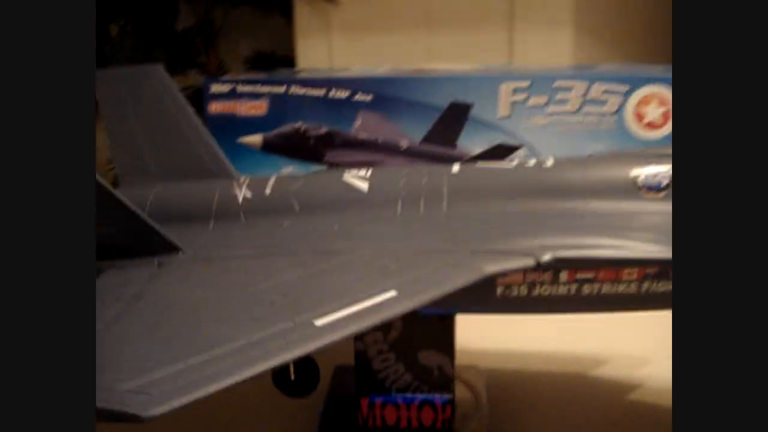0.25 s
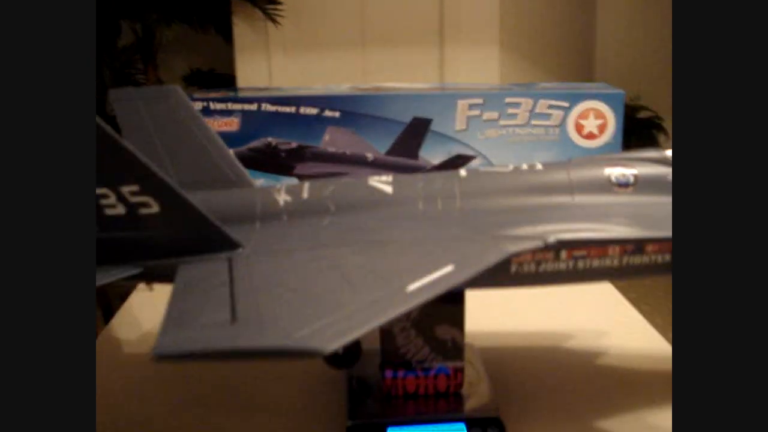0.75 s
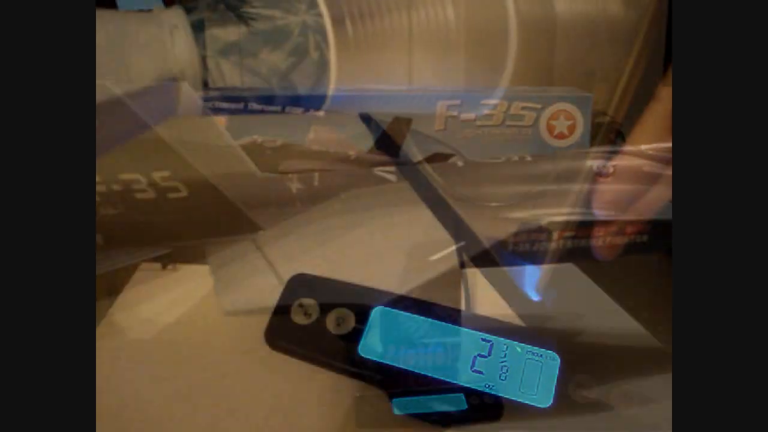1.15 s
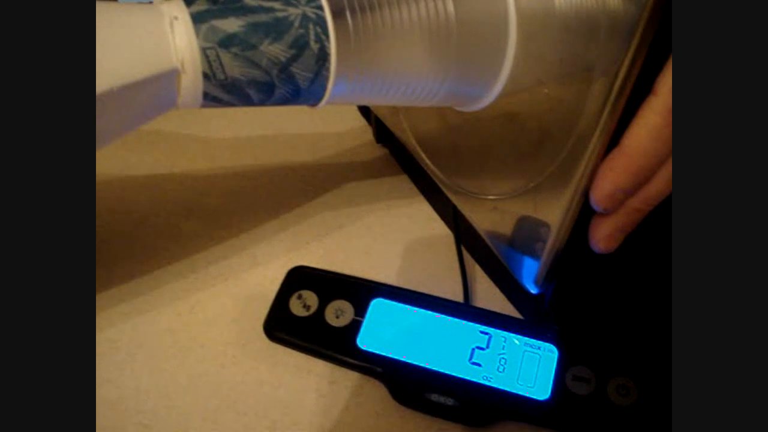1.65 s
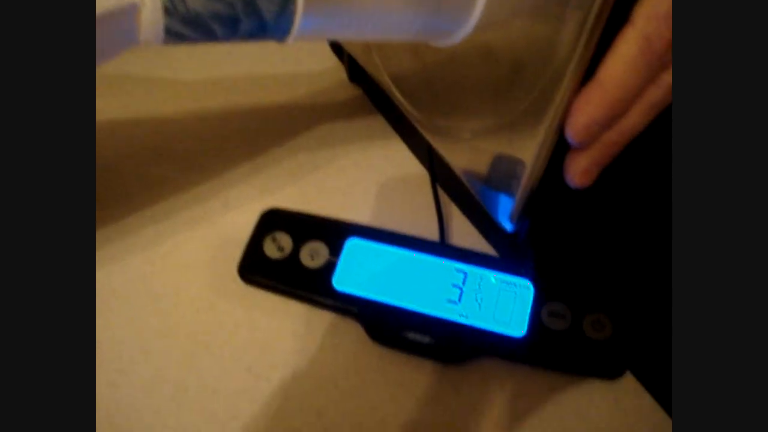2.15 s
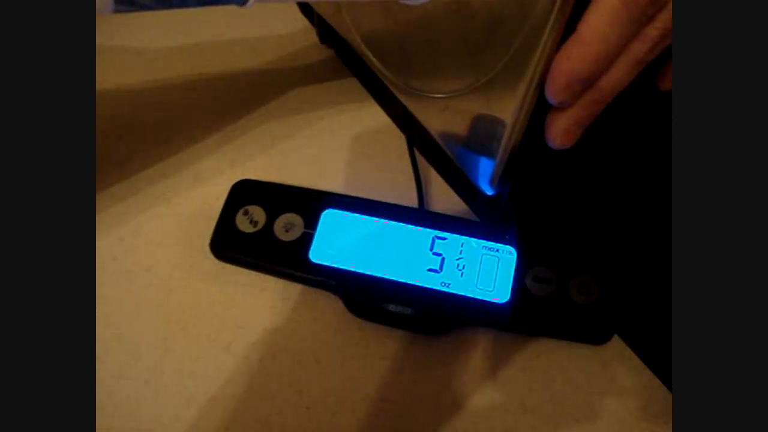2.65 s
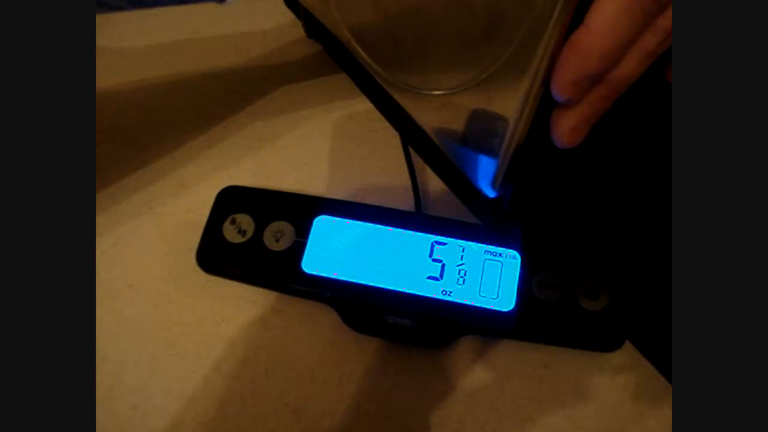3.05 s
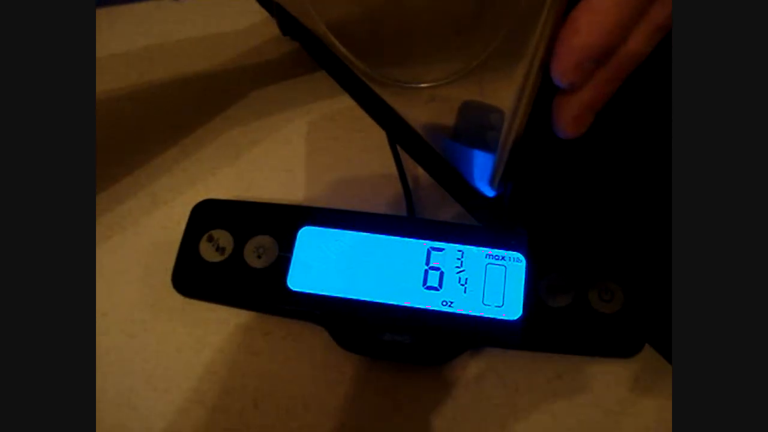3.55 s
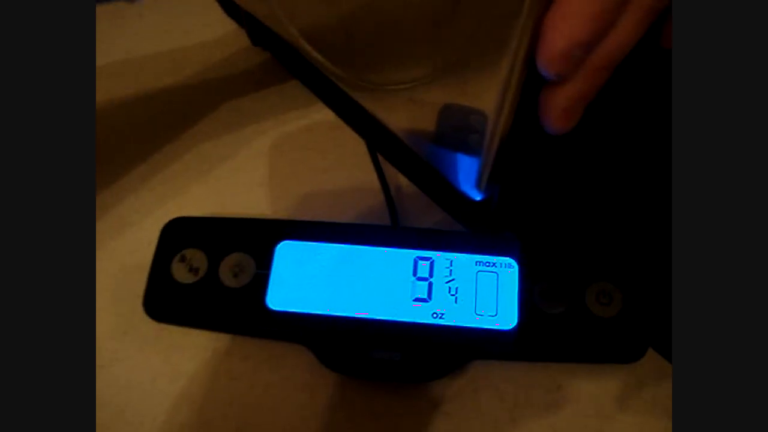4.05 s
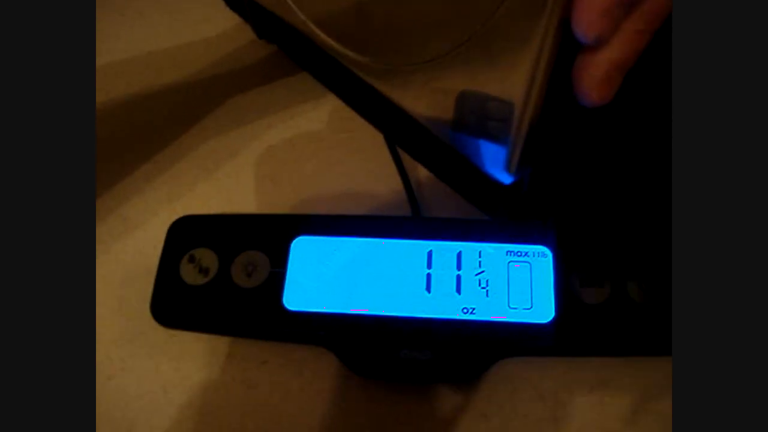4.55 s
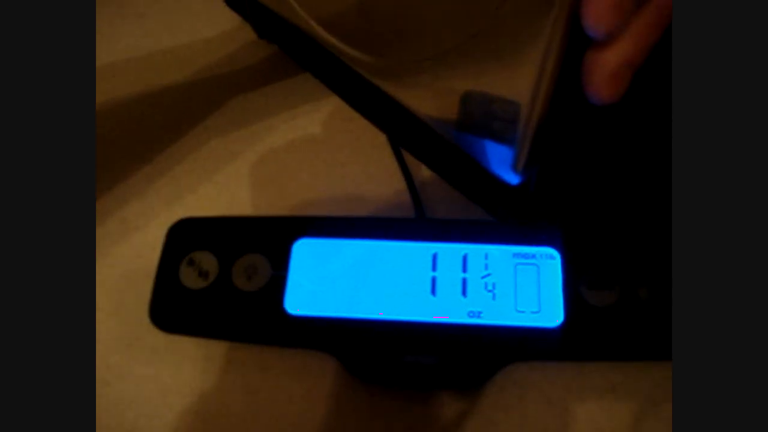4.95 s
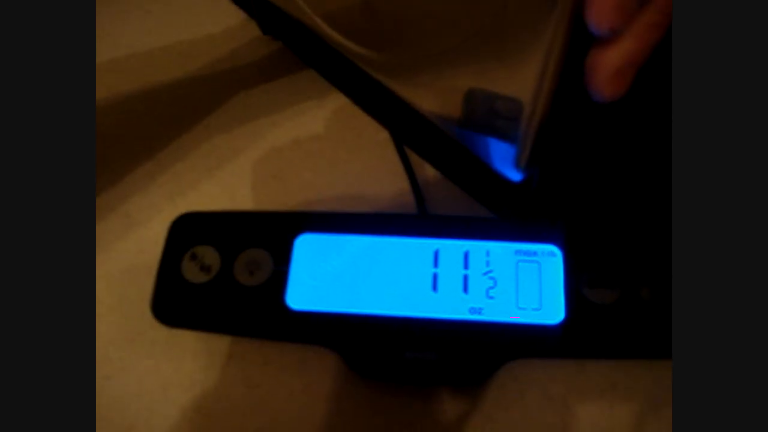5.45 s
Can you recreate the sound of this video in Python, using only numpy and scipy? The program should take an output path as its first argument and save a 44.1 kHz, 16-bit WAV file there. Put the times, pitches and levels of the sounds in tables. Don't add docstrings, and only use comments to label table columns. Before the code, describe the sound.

A small room, heard through one hand-held camera microphone with narrow, slightly holey treble. From 0 to 0.9 s there is only soft, low-weighted room hush, with scattered tiny bright ticks, very faint lens-motor blips and a sharper plastic snap at about 0.4 s. From 0.9 to 1.5 s an electric ducted fan fades in, already spinning, with a soft puff of wind on the microphone near 1.1 s. Its whirring hum, roughly 200 turns per second with stacked buzzing harmonics, holds until about 1.8 s, then climbs quickly through 2.3 to 2.6 s and on in smaller surges. A thin, steady-pitched high electronic whine swells around 1.5 s and most strongly at 2.9 s, then again from 3.5 s, fading slowly. Rough pulsing air rushes throughout. By 4.6 to 5.4 s the tone almost levels above twice its starting pitch, then rises again as the sound ends, still running.

```python
import sys
import numpy as np
from scipy import signal
from scipy.fft import rfft, irfft
from scipy.io import wavfile

SR = 44100
rng = np.random.default_rng(int(sys.argv[2]) if len(sys.argv) > 2 else 0)


def transcribe(signal):
    frames = np.atleast_2d(signal).T
    limited = np.clip(frames, -1, 1)
    pcm = np.round(limited * 32767).astype(np.int16)
    wavfile.write(sys.argv[1], SR, pcm)


def voltage_ratio(level):
    return 10 ** (np.asarray(level, float) / 20)


N = 251370

# pitch_hz, level_db
ROOM_COLOUR = [(20, -8.5), (60, -11.5), (150, -2.5), (300, 0.5), (430, -2.5), (560, -5.5), (1000, -9.5),
               (2200, -17.5), (3300, -15.5), (4000, -20), (4800, -16.5), (5800, -21), (7500, -19.5),
               (10000, -28.5)]
ROOM_BEFORE_DB, ROOM_UNDER_FAN_DB = -50.5, -61
FADE_FROM_S, FADE_S = 0.91, 0.62

# start_s, peak_db, pitch_hz
TICKS = [(0.0726, -35, 4900), (0.156, -39, 5730), (0.3232, -32, 7000), (0.358, -35, 4800),
         (0.434, -39, 5720), (0.4544, -38, 4500), (0.507, -36, 4800), (0.578, -44, 5200),
         (0.59, -34.5, 5800), (0.8916, -31, 4700), (0.9398, -38, 4750), (0.9567, -67, 4780)]
# start_s, end_s, pitch_hz, level_db
LENS_BLIPS = [(.155, .17, 5755, -60), (.205, .23, 5755, -62), (.24, .265, 5755, -62), (.3, .325, 5755, -62),
              (.19, .215, 6234, -64), (.24, .31, 6234, -69), (.35, .37, 4791, -60), (.435, .45, 5755, -62),
              (.555, .58, 4791, -63), (.612, .635, 5755, -60), (.69, .735, 4791, -64),
              (.89, .905, 4791, -59), (.955, .975, 4791, -62), (.61, .65, 8624, -74), (.72, .76, 8624, -73)]
# start_s, peak_db
SNAP = [
    (0.4052, -29),
]
# pitch_hz, level_db, time_to_fall_60_db_s
SNAP_MODES = [(5600, -2, 0.0041), (2420, -9, 0.0098), (1540, -8.5, 0.037)]

# time_s, speed_turns_per_s
THROTTLE = [(0.805, 176.8), (1.007, 205.6), (1.737, 204.4), (1.829, 239.6), (2.103, 236.9), (2.327, 318.6),
            (2.645, 306.0), (3.069, 334.4), (3.142, 353.3), (3.349, 336.0), (3.604, 372.4), (3.964, 375.9),
            (4.102, 410.2), (4.4, 432.7), (4.649, 417.1), (4.837, 435.1), (5.395, 433.8), (5.523, 491.2)]
ROTOR_LAG_S = 0.2555
MID_SPEED = 300

# pitch_hz, width_hz, level_db
TABLE = [(191.8, 4.6, 6), (212.8, 8, 0.3), (243, 24, -8.5), (250.7, 18, 2.5), (268.5, 12, -4.5),
         (284.3, 5.7, -2.7), (310.4, 13.6, -1), (322.5, 8.1, -0.2), (333.3, 9.3, -2.5), (358, 19, 0.7),
         (395.3, 9.7, 6), (417.7, 11, -0.6), (432.6, 5.4, 1), (446, 8.8, 2)]
STAND = [(354.6, 11.5, 12), (444.4, 9.6, -12), (460, 10, -8), (477, 9.9, -8), (480, 9.9, -16.5),
         (637.6, 7.5, 4.5), (697, 6.2, 7.5), (731.6, 26.8, 5.5), (766, 10, 4), (807.5, 45.4, 2),
         (866.8, 29, -2.6), (931, 44, 8), (1094.2, 51.7, -17), (1200.0, 20, 11)]
SHELL = [(539, 13, 10.0), (630.1, 24.5, 3.5), (666, 14, -5), (750, 120, -1.5), (883, 25, -6), (947, 12, -1),
         (1011, 30, -1), (1090.6, 47.0, -0.4), (1206, 59, 0.5), (1332, 110, -14), (1392, 43, 5.6),
         (1562, 41, 5), (1687, 33.8, -4.5), (1779, 46.9, 3.5)]
INTAKE = [(860, 290, 7), (1025, 18, 6), (1200, 24.5, -1), (1280, 61, -12), (1449.3, 89, 1.1),
          (1674.9, 25, -20.5), (1823, 27, -22.5), (2223, 52, -9.5), (2515, 41, -3), (2594, 46, 1.2),
          (2778, 40, -3), (3080, 220, -1), (3500, 310, -0.5), (4050, 210, 10.0)]
BLADE_ROW = [(1570, 66, -3.5), (1990, 89, -16.5), (2120, 69, -11), (2240, 96, -9.5), (2470, 220, -5.5),
             (2625, 69, -2.5), (2773, 108, 1), (2907, 91, -2), (3017, 137, 3.5), (3158, 200, -1.5),
             (3308, 85, -0.5), (3403, 60, -2.5), (3540, 75, 2), (3805, 120, -10)]
NOZZLE = [(3220, 140, -2), (3540, 150, -2), (3810, 110, 4.5), (4530, 220, 7), (4780, 100, 1),
          (4946, 210, 2), (5530, 150, 0), (5940, 210, 2.5), (6390, 350, 7.5), (6640, 240, 2.5),
          (6814, 170, 2), (6970, 260, -9)]
STATOR = [(5420, 220, -2.5), (6000, 180, -5), (7200, 200, -11.5), (8150, 200, 0), (8780, 220, -4.5),
          (8920, 150, -5.5), (9550, 100, -9.5)]
MOTOR_CAN = [(3350, 150, -11.5), (3650, 240, 0.5), (4050, 510, -3.5), (4500, 150, -5.5), (4670, 220, -3),
             (5600, 200, -10), (6400, 220, -11), (6860, 180, 0)]
WINDINGS = [(6880, 400, 5.2), (7280, 190, 0.5)]
FEET = [(323, 9.5, -10.5), (456, 15, -14.5), (505, 29, -17)]
MOUNT = [(762, 27, -0.5), (806, 21, -11), (893, 18, -6.5)]
# level_db (at mid speed), slope_db_per_octave
STRENGTH = [(-36, 1.6), (-39, -6), (-39, 2.5), (-41, -1.5), (-42.5, 11.5), (-46, 6), (-48, 9),
            (-48.5, -6.7), (-35.5, -0.5), (-48, -0.8), (-51, -12), (-41.5, -9), (-66, -23.5)]

SWITCH_HZ = 7577
# peak_s, rise_s, fall_s, level_db
WHINE_SWELLS = [
    (1.45, .25, .4, -51),
    (1.9, 0.13, 0.19, -66),
    (2.9, .15, 0.18, -47.5),
    (3.55, 0.16, 1.7, -51),
    (5.7, 0.18, .2, -55),
]

# pitch_hz, width_hz, level_db
RUMBLE = [(213, 120, 2.5), (330, 153, -4), (474, 210, 2.5)]
DUCT = [(754, 270, -1.5), (1100, 260, -15), (1283, 268, 1), (2125, 470, -7)]
WAKE = [(2340, 480, -8.5), (2750, 470, 4.5), (3390, 710, -1.5), (3870, 1500, -4.5)]
JET = [(4900, 680, -2.5), (6150, 900, -9.5), (6720, 1040, -5), (7300, 850, -11), (9000, 400, -15.5)]
# time_s, level_db
FLOW = [(.9, -33.5), (1.5, -35.5), (1.7, -36.5), (1.85, -37), (2.0, -35.5), (2.3, -36.5), (2.5, -34),
        (2.7, -34), (3.1, -35.5), (3.3, -34.5), (3.9, -37.5), (4.1, -35), (4.25, -36), (4.6, -39.5),
        (5.0, -37), (5.2, -37.5), (5.55, -35.5), (5.7, -38.5)]
# time_s, level_db
PUFFS = [
    (1.1, -55),
    (1.3, -71),
    (1.45, -82),
    (1.6, -73),
    (2.27, -77),
    (3.0, -71),
    (5.43, -65),
    (5.7, -70),
]

# start_s, length_s, lowest_hz
TREBLE_GAPS = [
    (.043, .024, 4600),
    (.083, .023, 5000),
    (.295, .024, 6500),
    (.396, .008, 2900),
    (.412, .021, 2700),
    (.514, .03, 5000),
    (.562, .01, 5500),
    (.597, .014, 4600),
    (.866, .021, 4600),
]


def rms_one(x):
    return x / np.sqrt(np.mean(x ** 2) + 1e-20)


def in_time(rows):
    s, *columns = np.transpose(rows)
    return [np.interp(np.arange(N) / SR, s, column) for column in columns]


def bump(x, width):
    return np.exp(-(x / width) ** 2)


def drift(rate):
    r = np.exp(-80 * np.pi * rate / SR)
    noise = rng.standard_normal(N // 40 + 2002)
    slow = signal.lfilter([1], [1, -2 * r, r * r], noise)[2000:]
    return np.interp(np.arange(N) / 40, np.arange(len(slow)), rms_one(slow))


def resonate(x, hz, width):
    r = np.exp(-np.pi * width / SR)
    feedback = [1, -2 * r * np.cos(2 * np.pi * hz / SR), r * r]
    return signal.lfilter([(1 - r * r) / 2, 0, (r * r - 1) / 2], feedback, x)


def ring(clicks, hz, t60):
    r, w = voltage_ratio(-60 / (t60 * SR)), 2 * np.pi * hz / SR
    return signal.lfilter([0, np.sin(w)], [1, -2 * r * np.cos(w), r * r], clicks + 1e-18)


def body_db(modes, hz):
    slow = hz[::64]
    gain = sum(voltage_ratio(db) / (1 + 2j * (slow - mode_hz) / width) for mode_hz, width, db in modes)
    gain_db = 20 * np.log10(np.abs(gain) + 1e-9)
    return np.interp(np.arange(N) / 64, np.arange(len(slow)), gain_db)


def tone(cycles, level_db, flutter_db, wobble):
    phase = 2 * np.pi * (cycles + rng.random()) + wobble * drift(17)
    flutter = flutter_db * (drift(22.3) + 0.59 * drift(60))
    return np.sqrt(2) * voltage_ratio(level_db + flutter) * np.sin(phase)


def room_tone(fade):
    hz = np.fft.rfftfreq(N, 1 / SR) + 1
    points_hz, points_db = np.transpose(ROOM_COLOUR)
    colour = voltage_ratio(np.interp(np.log(hz), np.log(points_hz), points_db))
    noise = rms_one(irfft(rfft(rng.standard_normal(N)) * colour, N))
    gain = np.hypot((1 - fade) * voltage_ratio(ROOM_BEFORE_DB), fade * voltage_ratio(ROOM_UNDER_FAN_DB))
    return gain * voltage_ratio(0.2 * drift(15)) * noise


def struck(s, db, length_s):
    burst, at = np.zeros(N), round(s * SR)
    fall = np.exp(-np.arange(400) / (length_s * SR))
    burst[at:at + 400] = voltage_ratio(db) * fall * rng.standard_normal(400) / np.sqrt(np.sum(fall ** 2))
    return burst


def camera_ticks():
    out = 0
    for s, db, hz in TICKS:
        hit = struck(s, db, length_s=0.0014)
        out = out + 0.48 * ring(hit, hz, t60=0.0048)
        out = out + ring(hit, 5400, t60=0.002) + 0.18 * ring(hit, 3400, t60=0.0016)
    return out


def lens_drive():
    out, t = 0, np.arange(N) / SR
    for start, end, hz, db in LENS_BLIPS:
        shape = np.clip(np.minimum(t - start, end - t) / 0.0038, 0, 1)
        out = out + voltage_ratio(db + 5) * shape * np.sin(2 * np.pi * hz * t)
    return out


def snap():
    (s, db), = SNAP
    start_hz, end_hz, fall_s = 4600, 1600, 0.00354
    t = np.maximum(np.arange(N) / SR - s, 0)
    hz = end_hz + (start_hz - end_hz) * bump(t, fall_s)
    shape = np.minimum(t / 0.00069, 1) * bump(t, 0.0049)
    chirp = voltage_ratio(db - 4.5) * shape * np.sin(2 * np.pi * np.cumsum(hz) / SR)
    hit = struck(s, db - 0.5, length_s=0.00076)
    return chirp + sum(voltage_ratio(mode_db) * ring(hit, mode_hz, t60) for mode_hz, mode_db, t60 in SNAP_MODES)


def shaft():
    asked, r = in_time(THROTTLE)[0], np.exp(-1 / (ROTOR_LAG_S * SR))
    return signal.lfilter([1 - r], [1, -r], asked - asked[0]) + asked[0]


def orders_in():
    return [(TABLE, [1]), (STAND, [2]), (SHELL, [3, 4]), (INTAKE, [5, 6, 7, 9]), (BLADE_ROW, [8]),
            (NOZZLE, [16]), (STATOR, [24]), (MOTOR_CAN, [18]), (WINDINGS, [36])]


def rotor_tones(speed):
    turns, octaves, out = np.cumsum(speed) / SR, np.log2(speed / MID_SPEED), 0
    pairs = [(body, order) for body, orders in orders_in() for order in orders]
    for (body, order), (db, slope_db) in zip(pairs, STRENGTH):
        level_db = db + slope_db * octaves + body_db(body, order * speed)
        rough = np.sqrt(order)
        out = out + tone(order * turns, level_db, flutter_db=0.68 + 0.3 * rough, wobble=0.084 * rough)
    for order, db, body in ((1.5, -36, FEET), (2.5, -37.5, MOUNT)):
        level_db = db + body_db(body, order * speed)
        out = out + tone(order * turns, level_db, flutter_db=1.5, wobble=0.4)
    return out


def controller(speed):
    t, turns = np.arange(N) / SR, np.cumsum(speed) / SR
    swell = sum(voltage_ratio(db) * bump(t - s, np.where(t < s, rise, fall)) for s, rise, fall, db in WHINE_SWELLS)
    out = swell * tone(SWITCH_HZ * t, 0, flutter_db=1.5, wobble=0.1)
    # order, pitch_hz, width_hz, level_db
    for order, hz, width, db in ((6, 9080, 71, -55), (12, 9970, 130, -61)):
        gain = voltage_ratio(db) * bump(SWITCH_HZ + order * speed - hz, width)
        out = out + gain * tone(SWITCH_HZ * t + order * turns, 0, flutter_db=1.5, wobble=0.1)
    return out


def rush(modes, level_db, turns, gust_db, beat):
    out = 0
    for hz, width, db in modes:
        band = resonate(resonate(rng.standard_normal(N), hz, 1.72 * width), hz, 1.72 * width)
        gust = gust_db * (drift(12) + 0.81 * drift(110))
        out = out + voltage_ratio(db + gust) * band
    return voltage_ratio(level_db) * rms_one(out) * (1 + beat * np.sin(2 * np.pi * turns))


def air(speed):
    turns, flow_db = np.cumsum(speed) / SR, in_time(FLOW)[0]
    octaves = np.log2(speed / MID_SPEED)
    effort = ROTOR_LAG_S * SR * np.gradient(speed) / speed

    def strength(db, slope_db, effort_db):
        return flow_db + db + slope_db * octaves + effort_db * effort

    rumble_stall = 7.4 * bump(np.log2(speed / 279), 0.11)
    duct_stall = 6.94 * bump(np.log2(speed / 258), 0.43)
    rumble = rush(RUMBLE, strength(-18, -6, 29) + rumble_stall, turns, gust_db=3.1, beat=0.12)
    duct = rush(DUCT, strength(-5.5, -3.5, 8.2) + duct_stall, turns, gust_db=1.58, beat=0.14)
    wake = rush(WAKE, strength(0.1, 0.1, 0.1), turns, gust_db=0.7, beat=0.1)
    jet = rush(JET, strength(-5.5, 0.66, 0.1), turns, gust_db=0.4, beat=0.13)
    return rumble + duct + wake + jet


def port_wind(fade):
    calm_db, puff_s = -74, 0.074
    band = signal.butter(2, [22, 140], "band", fs=SR, output="sos")
    low = signal.sosfilt(band, rng.standard_normal(N))
    puffs = sum(voltage_ratio(db) * bump(np.arange(N) / SR - s, puff_s) for s, db in PUFFS)
    return (fade * voltage_ratio(calm_db) + puffs) * voltage_ratio(2.5 * drift(12)) * rms_one(low)


def scene():
    speed, fade = shaft(), np.clip((np.arange(N) / SR - FADE_FROM_S) / FADE_S, 0, 1)
    room = room_tone(fade)
    camera = camera_ticks() + lens_drive() + snap()
    fan = fade * (rotor_tones(speed) + controller(speed) + air(speed))
    return np.tile(room + camera + fan + port_wind(fade), (2, 1))


def flicker(x, share=0.025, quiet_share=0.07, from_hz=3900):
    hz, t, cells = signal.stft(x[0], SR, nperseg=512)
    patch_s = np.r_[t, t[-1]][::2]
    chance = np.where(patch_s < FADE_FROM_S, quiet_share, share)
    patches = rng.random((len(hz) // 4 + 1, len(chance))) < chance
    lost = np.kron(patches, np.ones((4, 2)))[:len(hz), :len(t)] * (hz > from_hz)[:, None]
    return np.tile(signal.istft(cells * (1 - lost), SR, nperseg=512)[1][:N], (2, 1))


def slits(x, share=0.11, from_hz=4400):
    hz, t, cells = signal.stft(x[0, :SR], SR, nperseg=128)
    strips = rng.random((len(hz) // 2 + 1, len(t) // 3 + 1)) < share
    lost = np.kron(strips, np.ones((2, 3)))[:len(hz), :len(t)]
    lost = lost * (hz > from_hz)[:, None] * (t < FADE_FROM_S)
    opening = signal.istft(cells * (1 - lost), SR, nperseg=128)[1][:SR]
    return np.tile(np.r_[opening, x[0, SR:]], (2, 1))


def treble_gaps(x, kept=0.02):
    out, hz, t = x.copy(), np.fft.rfftfreq(SR, 1 / SR), np.arange(SR) / SR
    for start, length, low_hz in TREBLE_GAPS:
        spared = (hz > 5950) & (hz < 6450) & (length > 0.0205) & (low_hz > 4000)
        band = irfft(rfft(out[:, :SR]) * ((hz > low_hz) & (hz < 7400) & ~spared), SR)
        shape = np.clip(np.minimum(t - start, start + length - t) / 0.002, 0, 1)
        out[:, :SR] -= (1 - kept) * shape * band
    return out


def top_cut(x):
    return signal.sosfilt(signal.butter(12, 10390, fs=SR, output="sos"), x)


def record(dry):
    low_pass = signal.ellip(12, 0.5, 75, 10050, fs=SR, output="sos")
    narrow = signal.sosfilt(low_pass, dry)
    thinned = treble_gaps(slits(flicker(narrow)))
    return top_cut(thinned)


dry = scene()
out = record(dry)
transcribe(out)
```